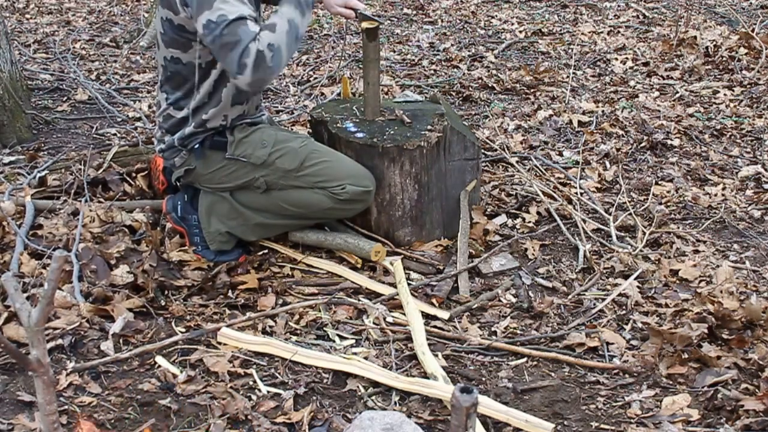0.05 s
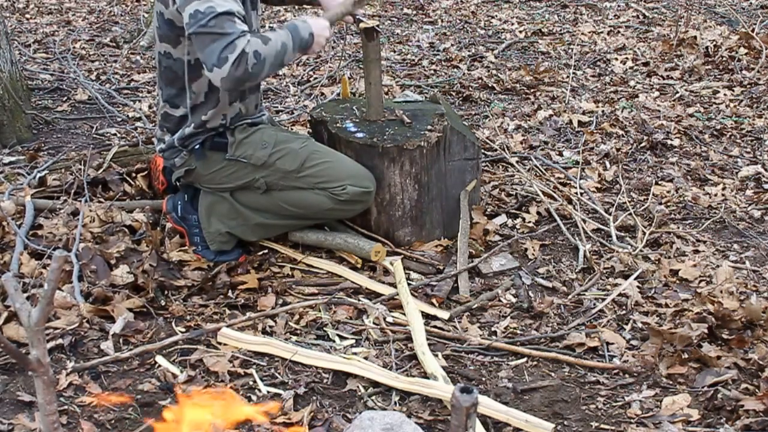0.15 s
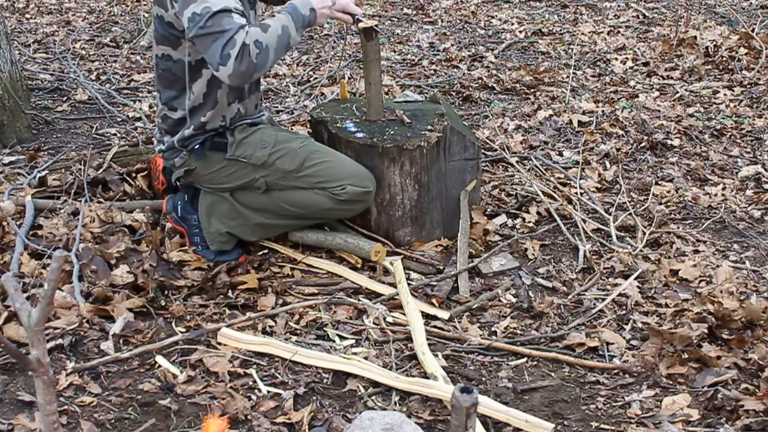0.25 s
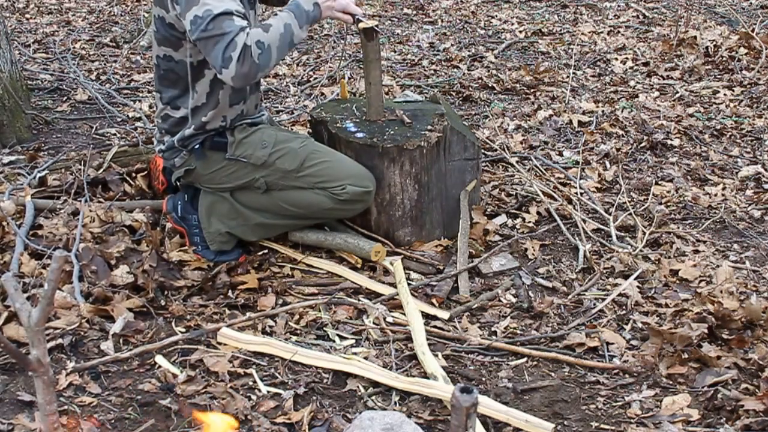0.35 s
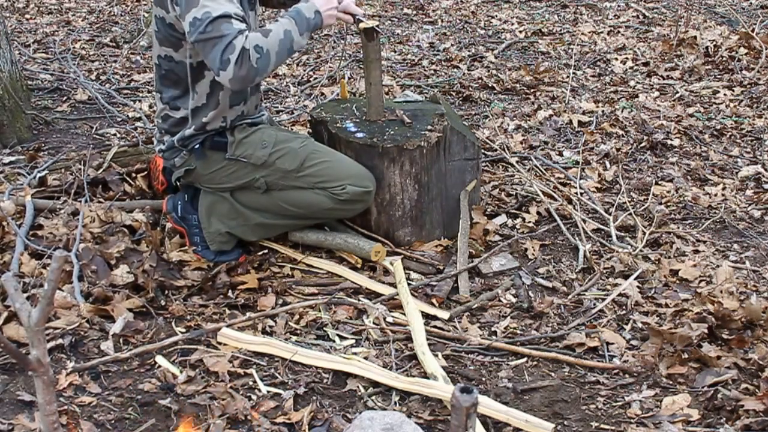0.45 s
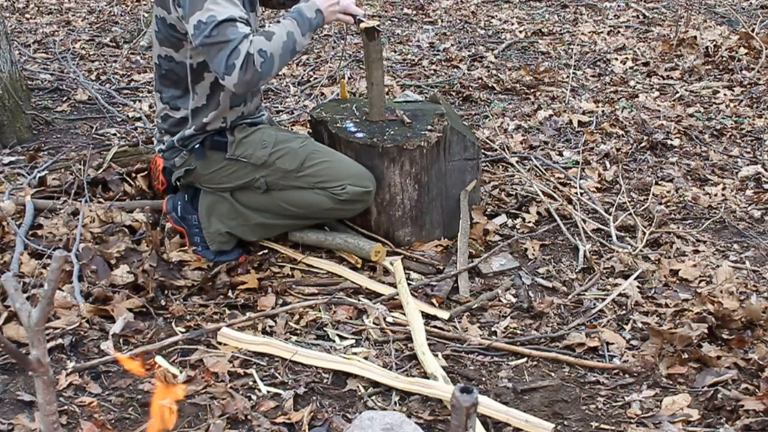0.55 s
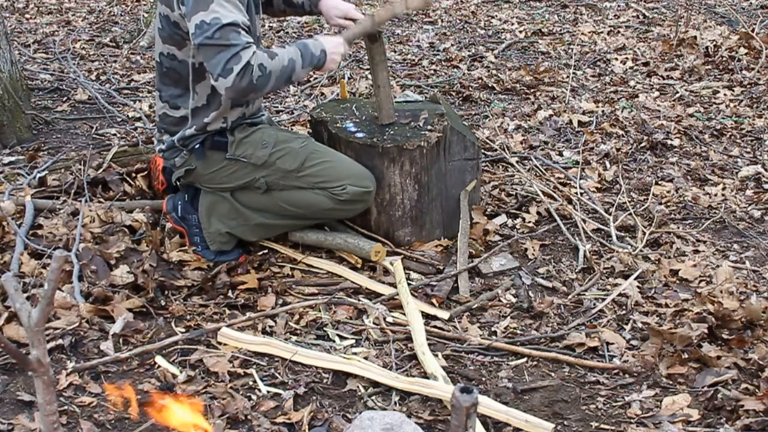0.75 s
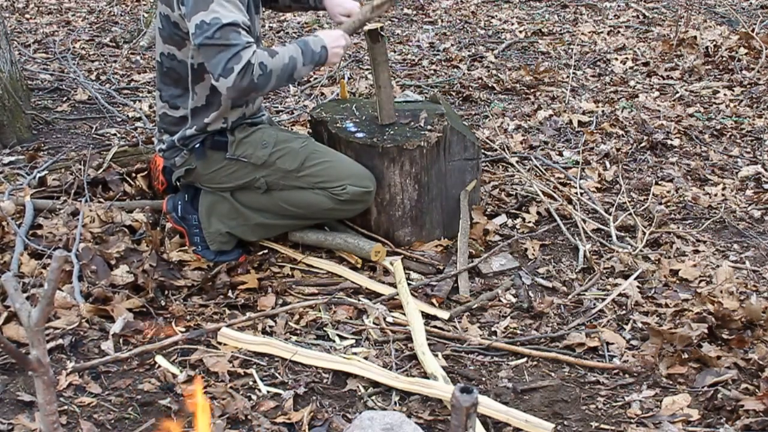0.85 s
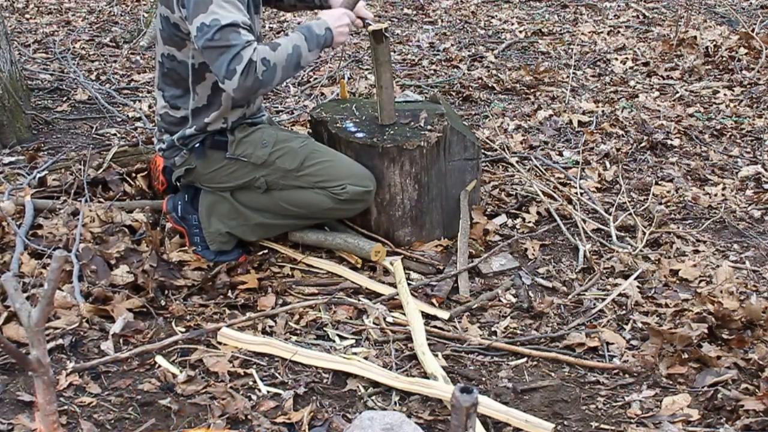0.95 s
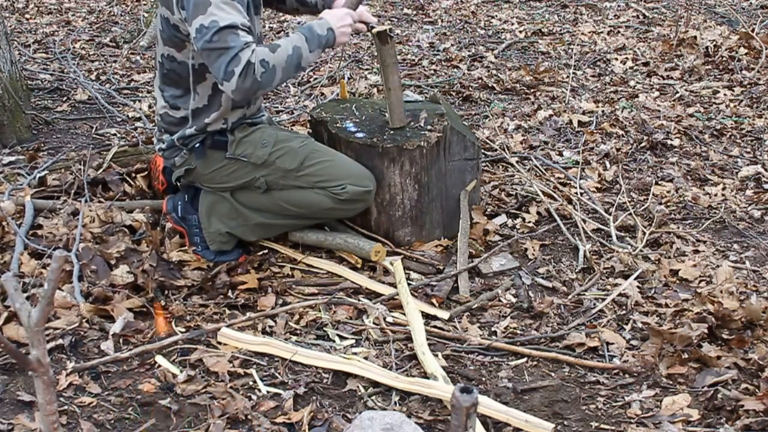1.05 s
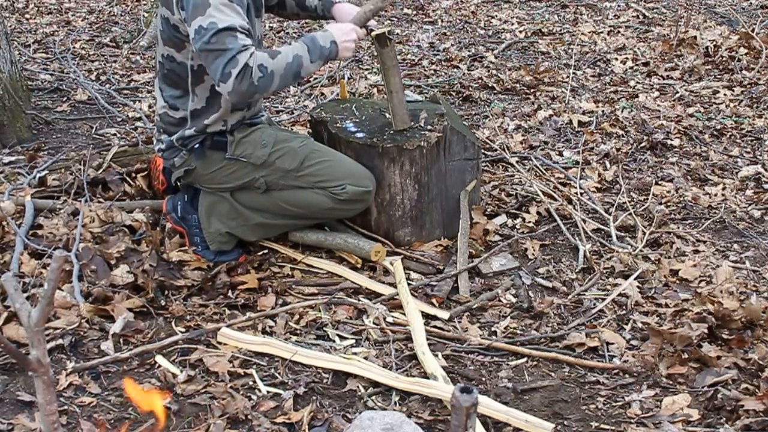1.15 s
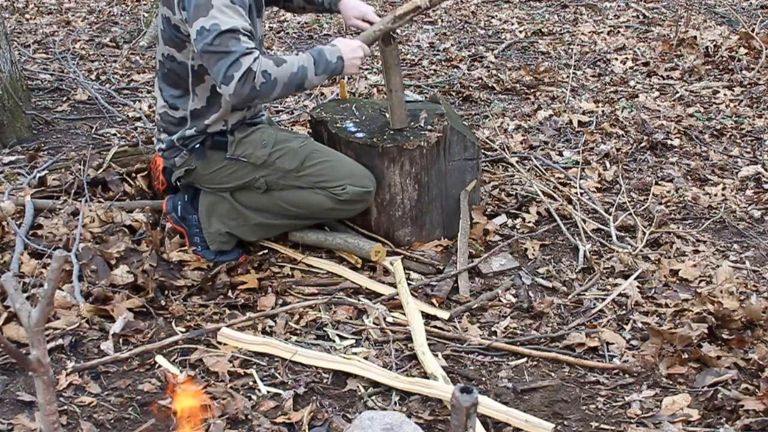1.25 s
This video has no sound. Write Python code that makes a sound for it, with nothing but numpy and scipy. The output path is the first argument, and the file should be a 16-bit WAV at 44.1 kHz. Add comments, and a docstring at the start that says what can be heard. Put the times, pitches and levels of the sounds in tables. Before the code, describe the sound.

A baton hits a knife stuck in a stick on a stump: one loud, cracking, distorted knock with a faint echo from the trees, then a rustle and a lighter knock, over a low outdoor rush.

```python
"""A low outdoor rush runs throughout as shaped noise; ticks of blade, bark and leaves are short resonant bursts.
After the first ticks a wooden baton strikes the back of a knife, driving it into a stick on a stump in the woods.
Decaying modes and noise bursts make this heavy knock, which overloads the microphone; the trees echo it faintly.
Later a sleeve and leaves rustle, a lighter second knock overloads too, a chip pings and a last rustle follows.
The gain control ducks the sound after each knock, then recovers."""
import sys
import numpy as np
from scipy import signal
from scipy.fft import rfft, irfft
from scipy.io import wavfile
from scipy.ndimage import uniform_filter1d, minimum_filter1d

SR = 44100
rng = np.random.default_rng(int(sys.argv[2]) if len(sys.argv) > 2 else 0)


def unload_audio(sound):
    """Save the sound as a 16-bit wav file, at the path given as the first command line argument."""
    columns = np.transpose(np.atleast_2d(sound))
    # keep every value between -1 and 1, then stretch to whole-number steps
    steps = np.round(np.clip(columns, -1, 1) * 32767)
    wavfile.write(sys.argv[1], SR, steps.astype(np.int16))


N = 57330  # samples, 1.3 s


def amp(db):
    """Level law: decibels to amplitude ratio."""
    return 10 ** (np.asarray(db) / 20)


def unit(x):
    """Normalization: scales a signal to rms 1."""
    return x / np.sqrt(np.mean(x ** 2) + 1e-20)


def read(points, hz):
    """Linear interpolation of a table on a logarithmic frequency axis."""
    f, value = np.transpose(points)
    return np.interp(np.log(hz + 1), np.log(f + 1), value)


def add(mix, s, sound):
    """Superposition: adds a sound to the mix from time s in seconds."""
    part = mix[max(round(s * SR), 0):][:len(sound)]
    part += sound[:len(part)]


def noise(colour):
    """Spectral shaping: white noise filtered by a colour (dB as a function of Hz), at rms 1."""
    spectrum = rfft(rng.standard_normal(N))
    hz = np.fft.rfftfreq(N, 1 / SR)
    return unit(irfft(spectrum * amp(colour(hz)), N))


def fall(t, t60):
    """Exponential decay, losing 60 dB in t60 seconds."""
    return np.exp(-np.log(1000) * t / t60)


def rise(rise_s):
    """Exponential onset with time constant rise_s in seconds."""
    t = np.arange(N) / SR
    return 1 - np.exp(-t / rise_s)


def burst(spectrum, rise_s, t60, grain_db=0):
    """Superposed tiny impacts: a dense noise cluster that swells and dies, with optional level grain."""
    t = np.arange(N) / SR
    wander = uniform_filter1d(uniform_filter1d(rng.standard_normal(N), size=40), size=20)
    grain = unit(amp(grain_db * unit(wander)))
    return grain * noise(lambda hz: read(spectrum, hz)) * rise(rise_s) * fall(t, t60)


# Outdoor rush before scaling to rms 1. Each row: frequency in Hz, relative spectral density in dB per Hz.
AIR_SPECTRUM = [(20, -20), (45, -6.5), (105, 1.5), (220, -9.5), (400, -10), (650, -13), (1300, -23.5),
                (2200, -28), (3200, -25.5), (4500, -29.5), (6600, -25.5), (8700, -29), (10500, -41.5),
                (14000, -47.5), (16000, -53.5)]
# Slow swell of the rush, in full only at low frequency. Each row: time in seconds, gain in dB.
RUMBLE_SWELL = [(0, -3), (.1, -0.5), (.3, -9), (.42, 0), (.54, 1.5), (.62, -2.5), (.69, 2), (.8, -4.5),
                (.9, -6), (1.05, -2.5), (1.14, -2), (1.3, 4.5)]
AIR_DB, AIR_PATCH_DB = -42, 2  # overall gain; rms of the random patches
RUMBLE_HZ = 350  # the swell in dB is halved here


def air():
    """Modulated broadband noise: drifting time-frequency patches and a slow low-frequency swell."""
    rush = noise(lambda hz: read(AIR_SPECTRUM, hz))
    hz, t, z = signal.stft(rush, SR, nperseg=1024)
    patches = uniform_filter1d(rng.standard_normal(z.shape), size=3, axis=0)
    patches = unit(uniform_filter1d(patches, size=8, axis=1))
    low_share = 1 / (1 + (hz[:, None] / RUMBLE_HZ) ** 2)
    swell_db = np.interp(t, *np.transpose(RUMBLE_SWELL)) * low_share
    modulated = z * amp(AIR_PATCH_DB * patches + swell_db)
    return amp(AIR_DB) * signal.istft(modulated, nperseg=1024)[1][:N]


# Small ticks of blade, bark and leaves. Each row: start in seconds, level in dB before the envelope,
# centre in Hz, distance from centre to the -6 dB point in octaves, t60 in seconds.
TICK_EVENTS = [(0.0760, -18.5, 5960, 0.16, 0.0074), (0.0759, -31.5, 6600, 0.82, 0.057),
               (0.0753, -28, 840, 1.15, 0.021), (0.493, -31, 7140, 0.37, 0.014),
               (0.6093, -26, 6400, 0.53, 0.0056), (0.671, -41, 5370, 0.51, 0.017),
               (0.8267, -29, 6700, 0.081, 0.013), (0.8368, -28.5, 5400, 0.38, 0.016),
               (0.8432, -30, 7040, 0.1, 0.0093), (0.8896, -43, 9450, 0.69, 0.0054),
               (0.993, -24, 7370, 0.28, 0.0064), (0.9920, -35.5, 2920, 0.21, 0.017),
               (1.0056, -39.5, 5000, 0.46, 0.01), (1.0672, -44.5, 2640, 1.3, 0.026)]
TICK_TOP_HZ = 8900  # -3 dB point of the dulling
TICK_RISE_S = 0.0002


def ticks():
    """Damped resonance: each snap is noise in one resonance, dulled at the top, decaying exponentially."""
    out, t = np.zeros(N), np.arange(N) / SR
    for s, db, centre_hz, octaves, t60 in TICK_EVENTS:

        def colour(hz):
            """Resonance curve in octaves with a fourth-order treble roll-off."""
            resonance = 1 + (np.log2((hz + 1) / centre_hz) / octaves) ** 2
            dulling = np.hypot(1, (hz / TICK_TOP_HZ) ** 4)
            return -20 * np.log10(resonance * dulling)

        add(out, s, amp(db) * noise(colour) * rise(TICK_RISE_S) * fall(t, t60))
    return out


CONTACT_S = 0.000067  # time constant of the blow's onset


def ring(modes, blow, length):
    """Modal superposition: damped sines of one object, each as strong as this blow excites it."""
    t = np.arange(N) / SR
    tones = np.zeros(N)
    for k, (hz, t60, *dbs) in enumerate(modes):
        sign = (-1) ** k  # neighbouring modes start in opposite phase
        tones += sign * amp(dbs[blow]) * fall(t, t60 * length) * np.sin(2 * np.pi * hz * t)
    return tones * rise(CONTACT_S)


# Baton, stick and stump. Each row: frequency in Hz, t60 in seconds before the blow's length share,
# relative level in dB in the heavy blow, relative level in dB in the light blow.
WOOD_MODES = [(119, 0.042, -14, -61), (234, 0.096, -33.5, -23.5), (325, 0.038, -14, -24),
              (483, 0.041, -10, -33), (664, 0.041, -9.5, -14.5), (850, 0.023, -15.5, -11.5),
              (957, 0.022, -10, -33), (1050, 0.023, -15.5, -2), (1416, 0.012, 5, -6.5),
              (1743, 0.013, 5, -12), (1877, 0.016, -5.5, -2), (2066, 0.025, -2, -29),
              (2570, 0.014, -16.5, -24)]


def wood(blow, length):
    """Modal vibration of baton, stick and stump."""
    return ring(WOOD_MODES, blow, length)


# Knife blade. Each row: frequency in Hz, t60 in seconds before the blow's length share,
# relative level in dB in the heavy blow, relative level in dB in the light blow.
BLADE_MODES = [(2862, 0.027, -3.5, -20), (3040, 0.028, -2, -10.5), (3457, 0.023, -8, -6),
               (3380, .024, -8, -33), (3814, 0.02, -16, 1.5), (4090, 0.026, -16, -6.5),
               (4600, 0.017, -11, -41), (4760, 0.02, -9.5, -46), (5674, 0.023, -7, -35),
               (5842, 0.011, -3, -0.5), (6190, 0.0169, -17.5, 1.5), (6590, 0.023, 0, -1.5),
               (6730, 0.013, -1, 4), (7503, 0.03, -9.5, -10)]


def blade(blow, length):
    """Modal vibration of the knife blade."""
    return ring(BLADE_MODES, blow, length)


# Crushing of bark and fibres. Each row: frequency in Hz, relative spectral density in dB per Hz.
SPLINTER_SPECTRUM = [(60, -26), (200, -28), (450, -6), (1500, 3), (3500, -2), (7000, -3.5), (8500, -11),
                     (10500, -34.5), (14000, -39.5), (20000, -59.5)]


def splinters(t60):
    """Fracture noise: bark and fibres crush in a dense burst."""
    return burst(SPLINTER_SPECTRUM, 0.0002, t60)


# Scatter from nearby leaves and stems. Each row: frequency in Hz, relative spectral density in dB per Hz.
NEAR_SPECTRUM = [(100, -15), (250, -15.5), (550, -8.5), (1100, -2), (1700, -15.5), (2500, 4), (4500, -3.5),
                 (7200, -1.5), (9000, -15.5), (11000, -32), (14000, -51)]
NEAR_T60_S, NEAR_RISE_S, NEAR_GRAIN_DB = 0.098, 0.0098, 2


def near_scatter():
    """Multiple scattering: leaves and stems return a short grainy wash."""
    return burst(NEAR_SPECTRUM, NEAR_RISE_S, NEAR_T60_S, NEAR_GRAIN_DB)


# Echo of the woods. Each row: frequency in Hz, relative spectral density in dB per Hz.
WOODS_SPECTRUM = [(200, -20.5), (600, -9), (1200, -6), (1460, -1.5), (1570, -1), (1730, 3), (2000, -3.5),
                  (2500, -8), (3200, -9), (5000, -13), (7000, -12.5), (10000, -30.5)]
# Decay of that echo. Each row: frequency in Hz, t60 in seconds.
WOODS_DECAY = [(300, 0.9), (1700, 1.45), (3500, 1.53), (7000, 1.03), (12000, 0.15)]
WOODS_DB, WOODS_RISE_S = -36.5, 0.005  # gain before the blow's own echo level; onset time constant


def woods():
    """Diffuse reverberation from the trunks: decay depends on frequency, and the top treble dies first."""
    echo = noise(lambda hz: read(WOODS_SPECTRUM, hz))
    hz, t, z = signal.stft(echo, SR, nperseg=256)
    decayed = z * fall(t, read(WOODS_DECAY, hz)[:, None])
    tail = signal.istft(decayed, SR, nperseg=256)[1][:N]
    return amp(WOODS_DB) * tail * rise(WOODS_RISE_S)


# Dull bounce off the ground. Each row: frequency in Hz, relative spectral density in dB per Hz.
GROUND_SPECTRUM = [(120, -20), (300, -11.5), (420, -6), (520, 8), (620, -3.5), (780, -3), (1080, -6.5),
                   (1300, -24), (1700, 10.5), (2300, -11.5), (5000, -47), (10000, -40)]
GROUND_DELAY_S, GROUND_RISE_S, GROUND_T60_S = 0.0125, 0.0011, 0.032


def ground_bounce():
    """Reflection: the ground returns a dull burst."""
    return burst(GROUND_SPECTRUM, GROUND_RISE_S, GROUND_T60_S)


# The heavy blow, then the light one. Each row: start in seconds, ring gain in dB, ring length as a share
# of the modes' t60, splinter gain in dB, splinter t60 in seconds, near scatter gain in dB,
# ground gain in dB, echo gain in dB on top of WOODS_DB.
BLOW_EVENTS = [(0.1568, 6.5, 0.9, 12, 0.019, -14.5, -9, 1.5),
               (0.8088, -4.5, 0.65, -6, 0.016, -23.5, -46, -24)]


def knocks():
    """Impact excitation: each blow rings wood and blade, crushes fibres, and scatters off ground and trees."""
    out = np.zeros(N)
    for blow, row in enumerate(BLOW_EVENTS):
        s, ring_db, length, splinter_db, splinter_t60, near_db, ground_db, echo_db = row
        add(out, s, amp(ring_db) * (wood(blow, length) + blade(blow, length)))
        add(out, s, amp(splinter_db) * splinters(splinter_t60))
        add(out, s, amp(near_db) * near_scatter())
        add(out, s, amp(echo_db) * woods())
        add(out, s + GROUND_DELAY_S, amp(ground_db) * ground_bounce())
    return out


# Sleeve and leaves rustling as the arm lifts. Each row: time of the peak in seconds,
# half length to 1/e of the peak in seconds, peak level in dB.
RUSTLE_EVENTS = [(0.651, 0.023, -47), (1.081, .04, -50.5)]
# Colour of the rustle. Each row: frequency in Hz, relative spectral density in dB per Hz.
RUSTLE_SPECTRUM = [(800, -23), (1800, 3), (3300, 5.5), (6000, 0.5), (9000, -4), (14000, -36)]


def rustles(grain_db=3):
    """Friction noise: soft bell-shaped swells of cloth and leaves, with random grain in level."""
    t = np.arange(N) / SR
    level = sum(amp(db) * np.exp(-((t - s) / half) ** 2) for s, half, db in RUSTLE_EVENTS)
    wander = uniform_filter1d(rng.standard_normal(N), size=90)
    grain = amp(grain_db * unit(wander))
    return level * unit(grain * noise(lambda hz: read(RUSTLE_SPECTRUM, hz)))


# A loose chip that pings once after the light blow. Each row: frequency in Hz, t60 in seconds, level in dB.
CHIP_MODES = [(3980, .028, -33), (2450, .035, -39)]
CHIP_S = 0.8786  # start in seconds


def chip():
    """Modal vibration of a small piece of wood, in two short modes."""
    out, t = np.zeros(N), np.arange(N) / SR
    tones = sum(amp(db) * fall(t, t60) * np.sin(2 * np.pi * hz * t) for hz, t60, db in CHIP_MODES)
    add(out, CHIP_S, tones * rise(TICK_RISE_S))
    return out


def scene():
    """Linear superposition of everything that reaches the microphone."""
    return (air() + ticks() + knocks() + rustles() + chip())[None]


# The gain control takes off the share SQUEEZE of the excess in dB above THRESHOLD_DB.
THRESHOLD_DB, SQUEEZE = -20, 0.34
ATTACK_S, HOLD_S, RECOVER_DB_PER_S = 0.0064, 0.076, 68  # recovery rate of the excess, before SQUEEZE
CEILING, EDGE_HZ = 1.0, 15600  # clipping amplitude; low-pass cutoff


def record(dry):
    """Compression with lag: gain falls too late for the knocks, which clip; it holds, recovers; low-pass last."""
    x, t = dry[0], np.arange(N) / SR
    pole = np.exp(-1 / (ATTACK_S * SR))
    power = signal.lfilter([1 - pole], [1, -pole], x ** 2)
    over_db = np.maximum(10 * np.log10(power + 1e-12) - THRESHOLD_DB, 0)
    # the hold is a running maximum over the past HOLD_S
    hold = int(HOLD_S * SR / 2)
    held_db = -minimum_filter1d(-over_db, 2 * hold + 1, origin=hold, mode="constant")
    # the excess may fall no faster than the recovery rate
    recovery_db = RECOVER_DB_PER_S * t
    duck_db = np.maximum.accumulate(held_db + recovery_db) - recovery_db
    smooth_db = signal.lfilter([1 - pole], [1, -pole], duck_db)
    ducked = x * amp(-SQUEEZE * smooth_db)
    clipped = np.clip(ducked, -CEILING, CEILING)
    low_pass = signal.firwin(81, EDGE_HZ, window=("kaiser", 7), fs=SR)
    return signal.oaconvolve(clipped, low_pass, "same")[None]


dry = scene()
out = record(dry)
unload_audio(out)
```